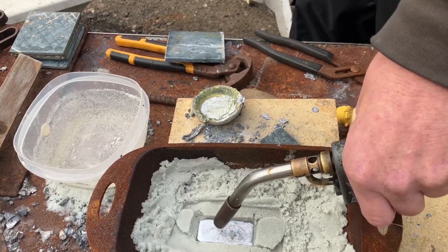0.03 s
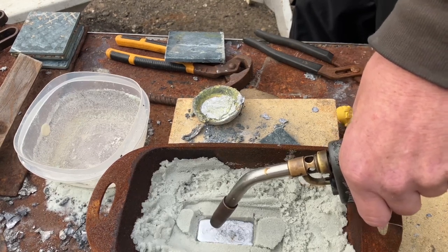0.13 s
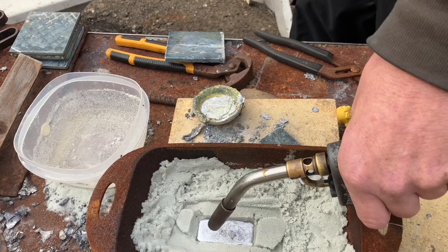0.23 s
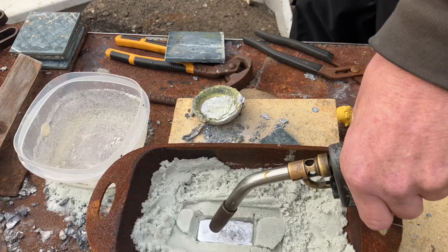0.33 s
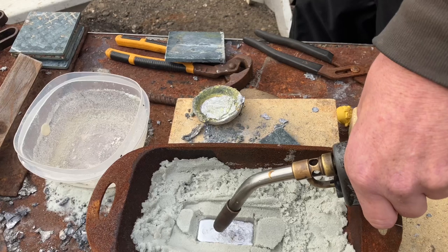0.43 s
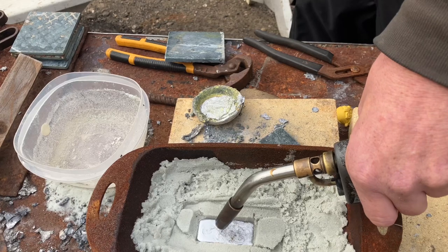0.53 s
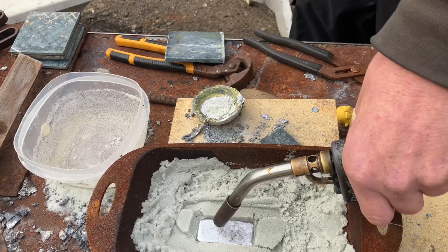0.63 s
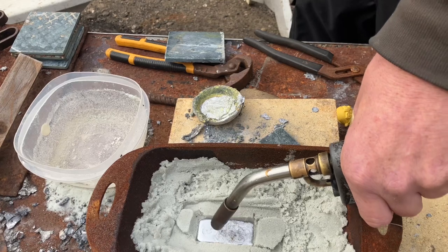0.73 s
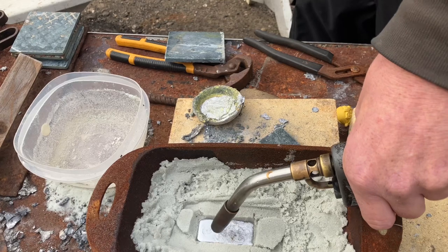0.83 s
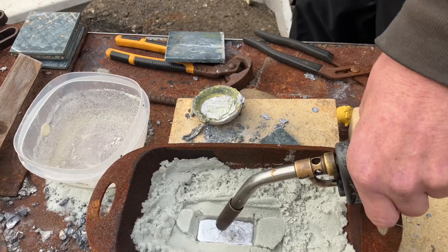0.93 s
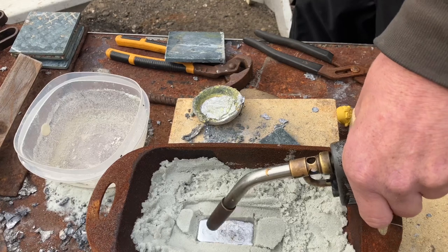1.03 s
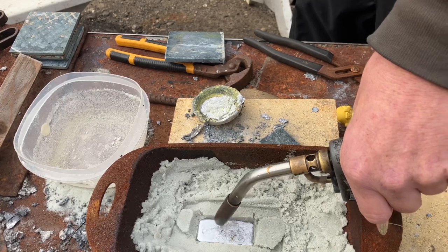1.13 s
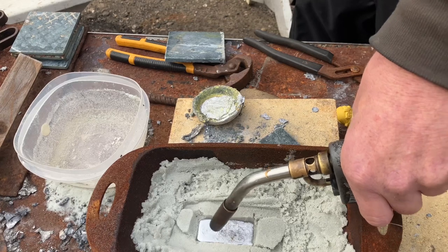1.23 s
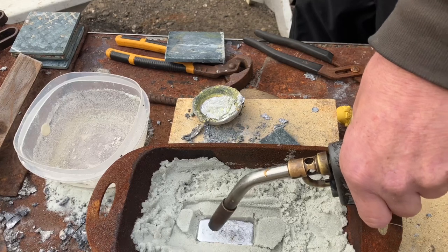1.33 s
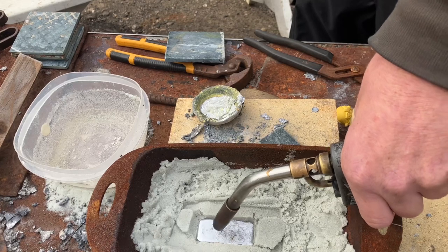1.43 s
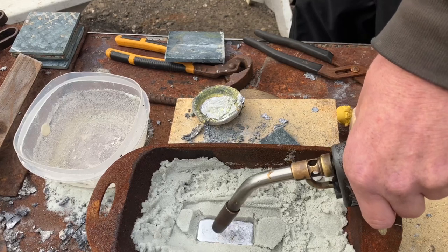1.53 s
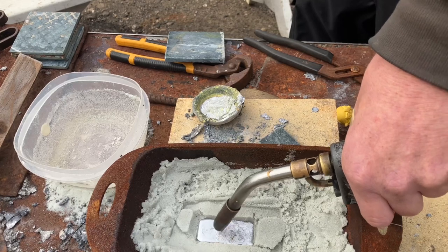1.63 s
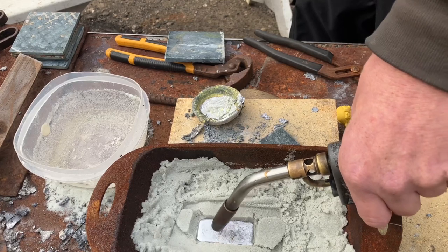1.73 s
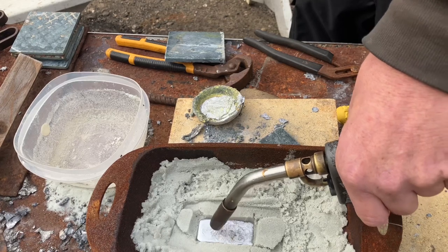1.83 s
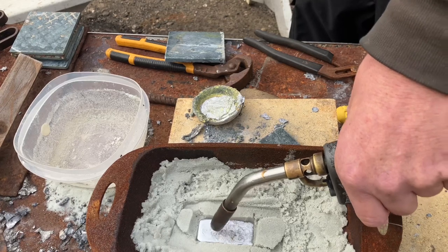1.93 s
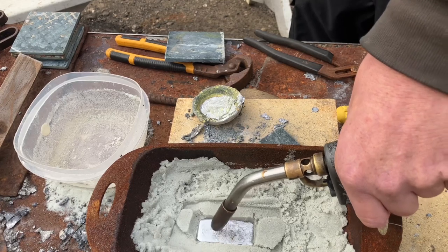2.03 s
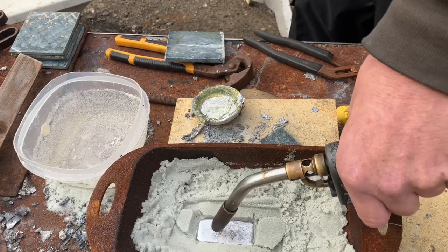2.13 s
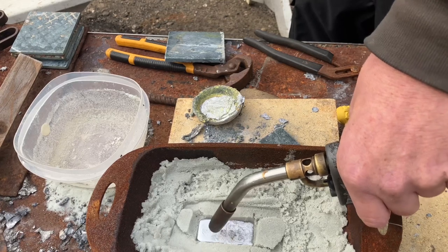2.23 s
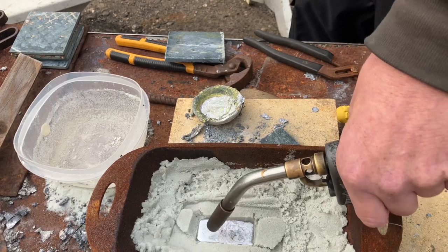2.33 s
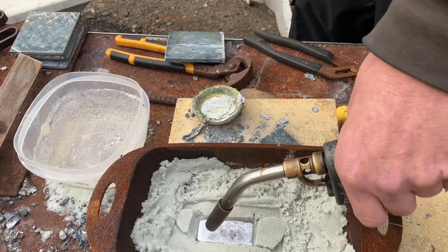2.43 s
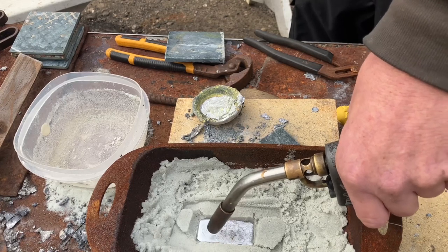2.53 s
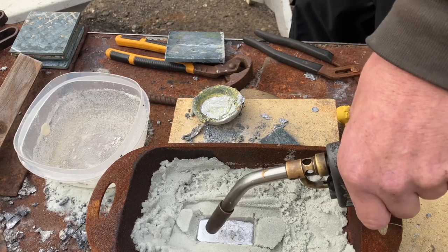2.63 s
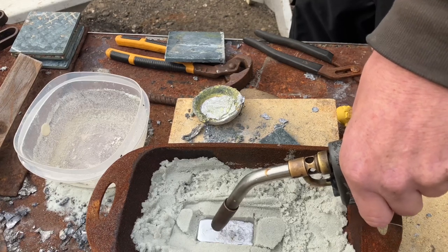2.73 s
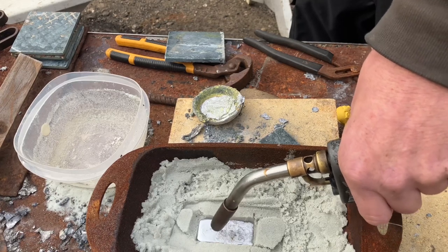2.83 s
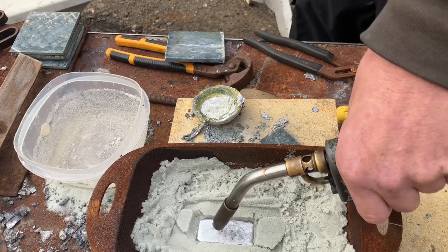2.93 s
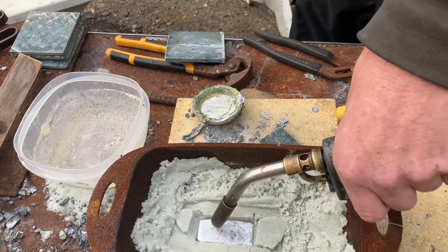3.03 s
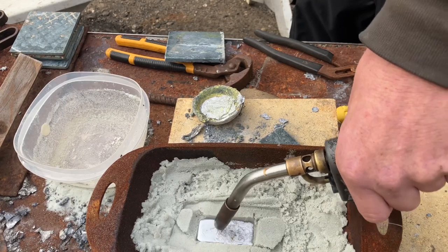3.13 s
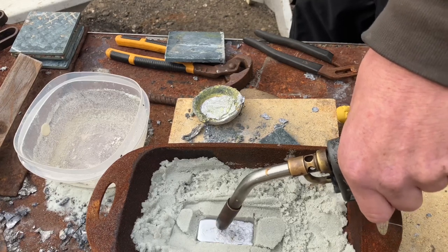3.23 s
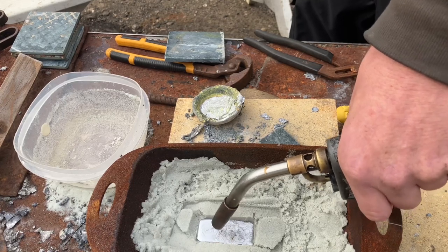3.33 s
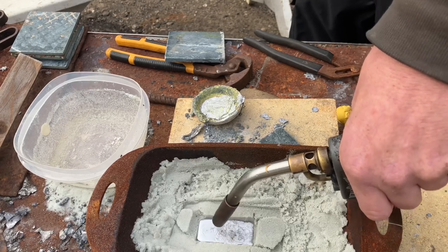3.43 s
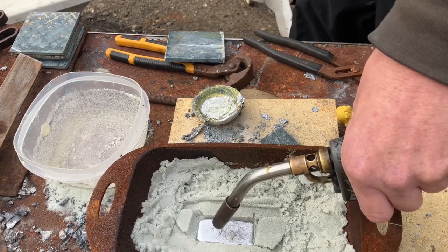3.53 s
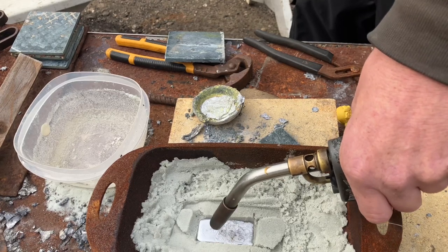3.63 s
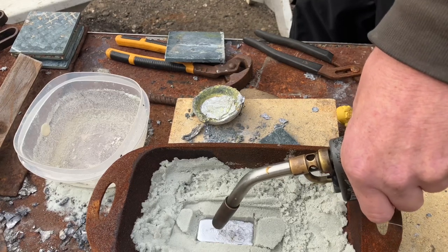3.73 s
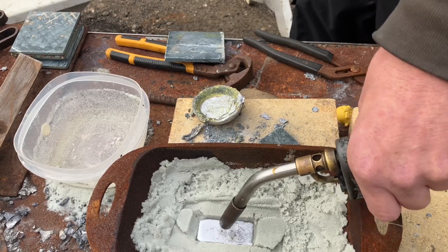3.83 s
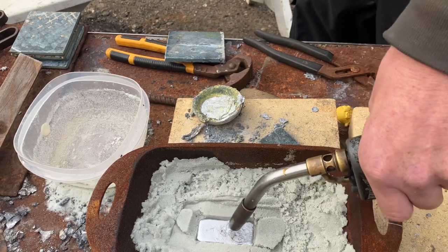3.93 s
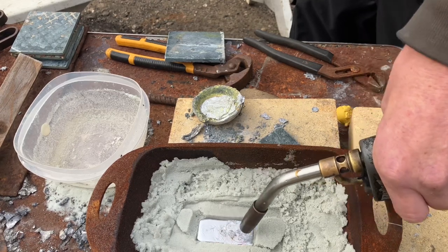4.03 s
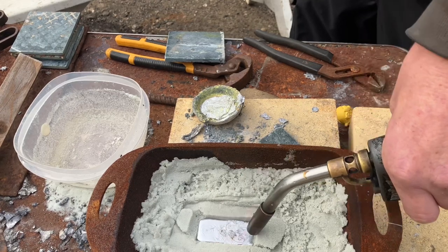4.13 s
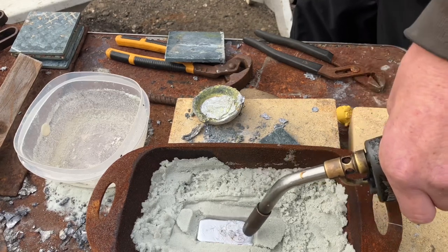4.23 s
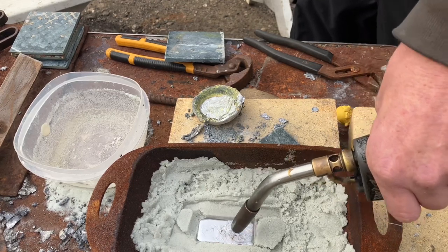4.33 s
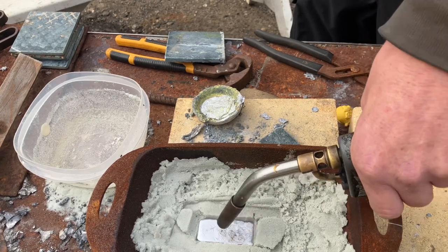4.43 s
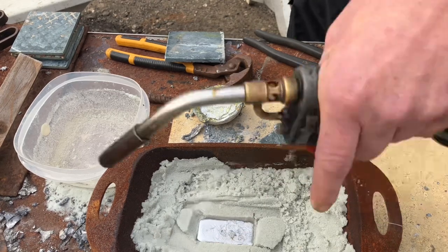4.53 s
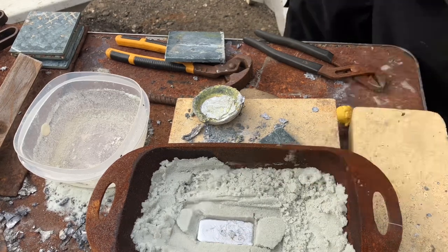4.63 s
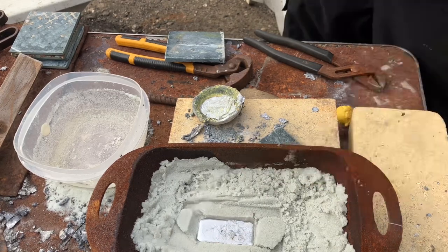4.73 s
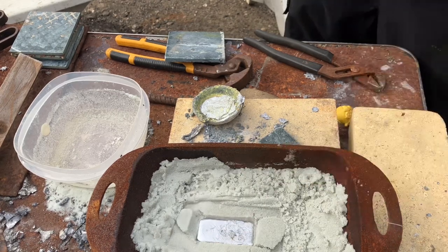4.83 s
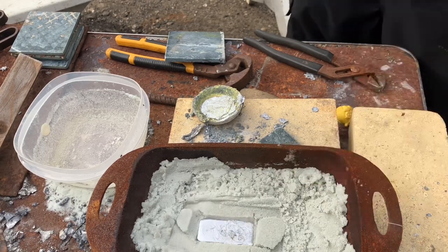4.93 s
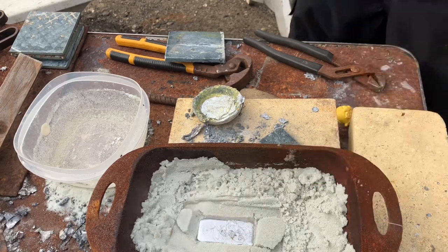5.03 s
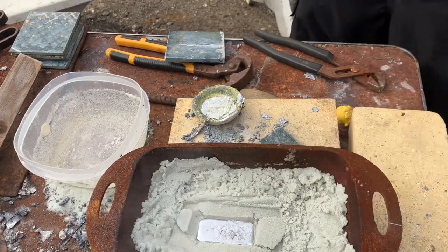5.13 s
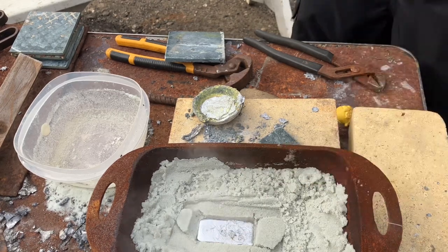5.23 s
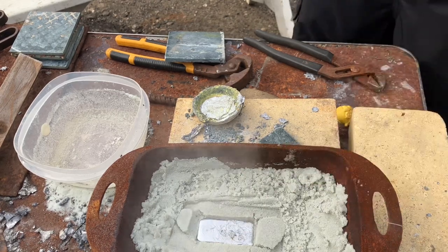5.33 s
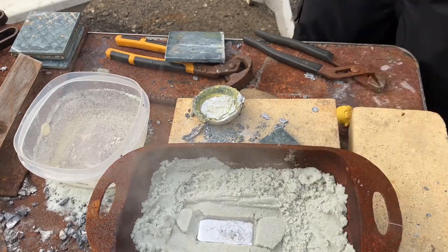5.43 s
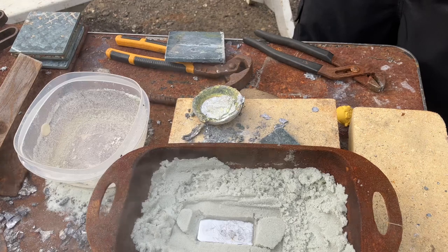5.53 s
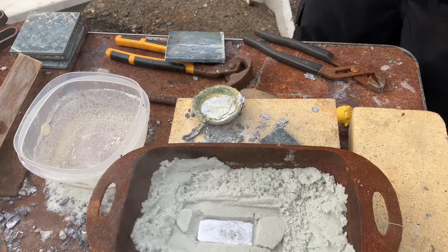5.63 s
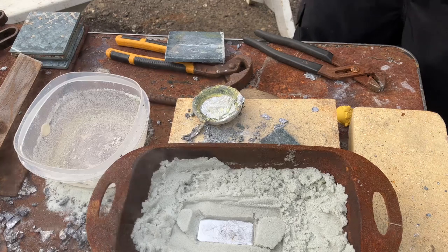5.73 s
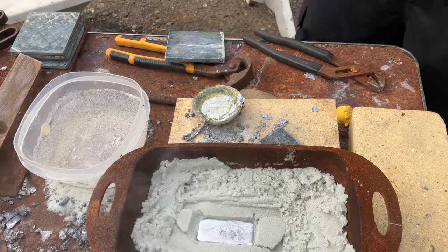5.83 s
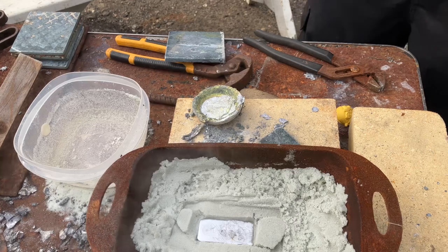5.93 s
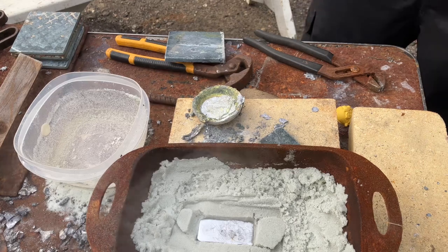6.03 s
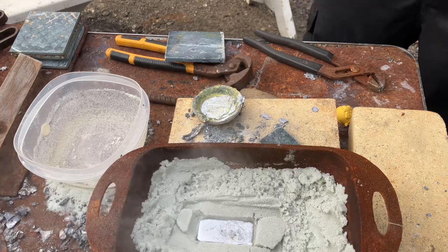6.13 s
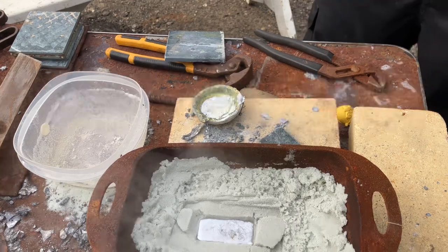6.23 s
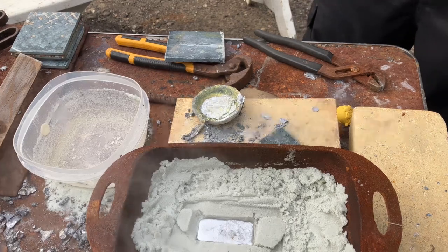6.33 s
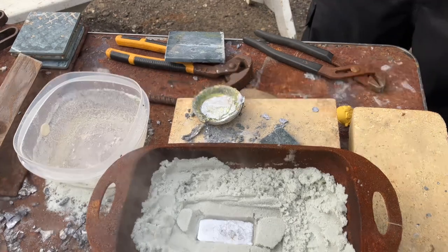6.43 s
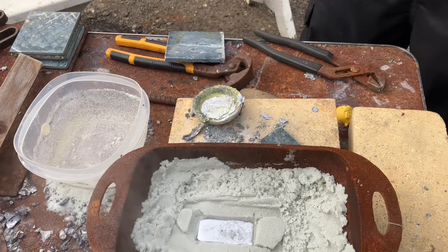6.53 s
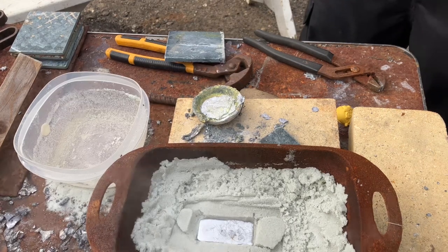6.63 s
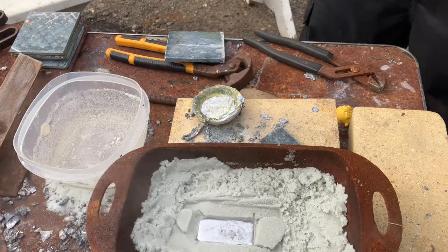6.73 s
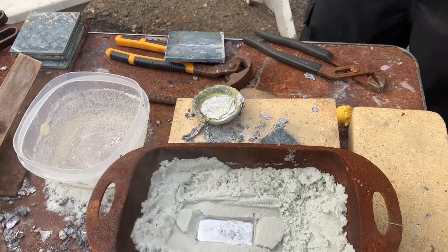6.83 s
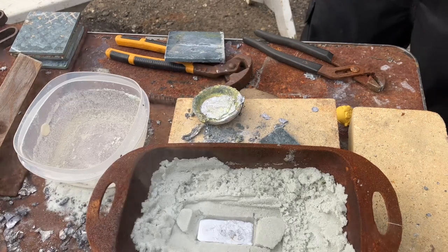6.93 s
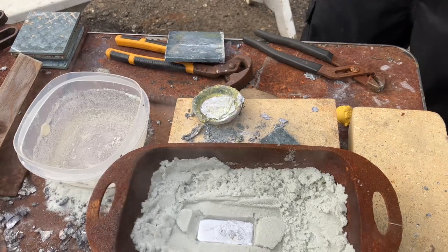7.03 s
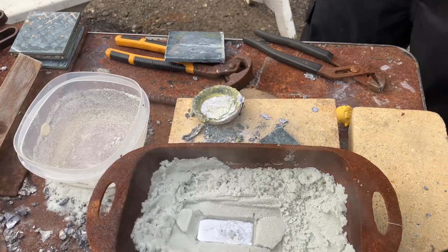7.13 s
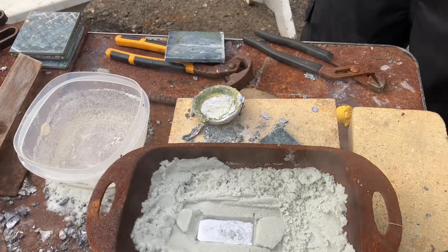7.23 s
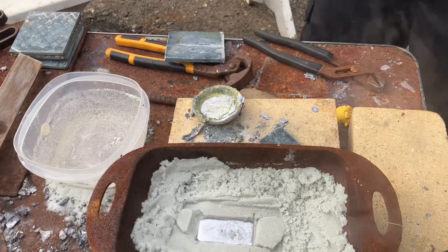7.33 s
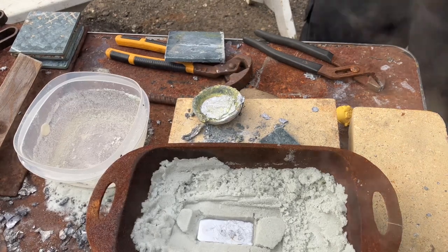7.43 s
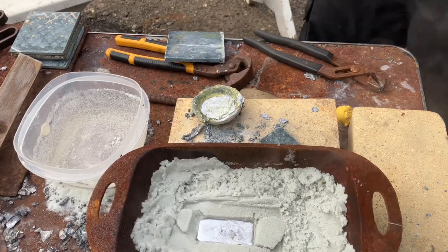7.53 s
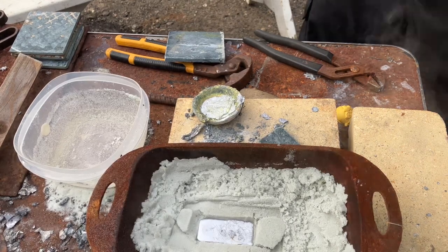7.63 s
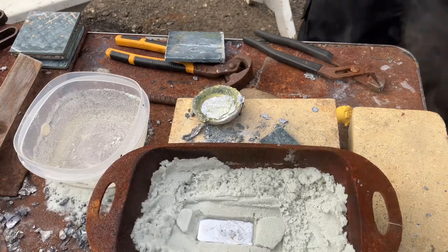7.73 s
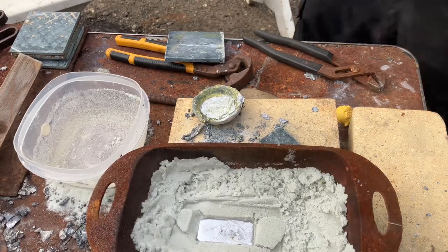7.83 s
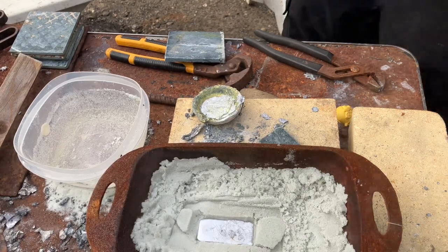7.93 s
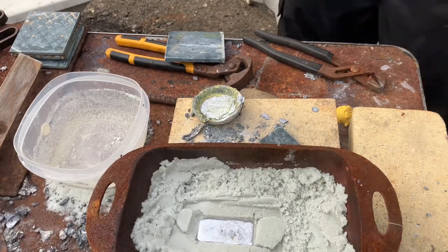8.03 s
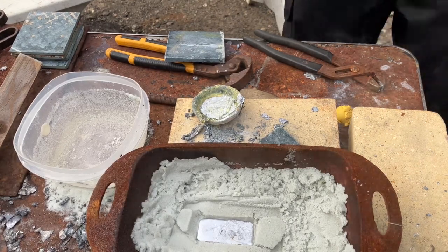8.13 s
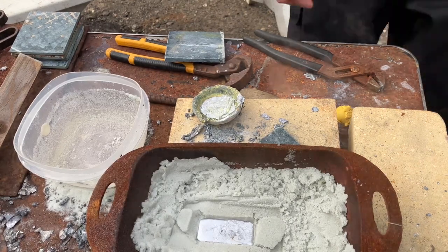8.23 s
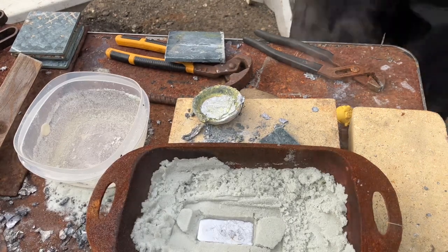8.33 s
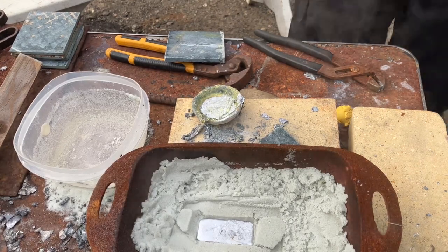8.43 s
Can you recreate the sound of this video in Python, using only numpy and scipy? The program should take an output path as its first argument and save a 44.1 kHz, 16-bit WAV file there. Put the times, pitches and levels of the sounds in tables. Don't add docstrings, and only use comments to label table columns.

```python
import sys
import numpy as np
from scipy import signal
from scipy.fft import rfft, irfft, next_fast_len
from scipy.io import wavfile
from scipy.ndimage import uniform_filter1d

SR = 44100
rng = np.random.default_rng(int(sys.argv[2]) if len(sys.argv) > 2 else 0)


def master_out(mix):
    frames = np.transpose(np.atleast_2d(mix))
    ceiling = np.clip(frames, -1, 1)
    pcm = np.round(ceiling * 32767).astype(np.int16)
    wavfile.write(sys.argv[1], SR, pcm)


def how_loud(loudness_db):
    steps = np.asarray(loudness_db, float) / 20
    return 10 ** steps


N = 374409
BINS = np.fft.rfftfreq(1024, 1 / SR)
FRAMES = N // 256 + 8

# pitch in Hz, level in dB per Hz.
YARD_COLOUR = [(30, -49.5), (60, -13), (110, -0.5), (200, -6), (400, -10.5), (600, -16), (900, -20),
               (1300, -12), (1800, -14.5), (2400, -21.5), (3300, -31.5), (5000, -46), (9500, -50.5),
               (15500, -59.5)]
# pitch in Hz, likeness from -1 to 1.
FAR_SAME = [(60, .9), (250, .93), (700, .25), (1200, -.2), (2000, -.35), (3500, -.3), (7000, 0),
            (9500, -.3), (11500, .8), (12600, .97), (13600, .3), (15200, -.9)]
# time in seconds, level in dB.
HUM = [
    (4.6, -60.5),
    (5.59, -56),
    (5.95, -61),
    (7.2, -61.5),
    (7.5, -52),
    (8.21, -53.5),
    (8.49, -67),
]
HUM_HZ = 129.2
WASH_DB, RUMBLE_DB = -64, -55.5
RECOVER_DB, RECOVER_S = -9, 1.11

# pitch in Hz, likeness from 0 to 1.
NEAR_SAME = [(60, .93), (250, .995), (2000, .98), (3000, .85), (4500, .7), (6200, .65), (7600, .3),
             (8900, .65), (9800, .65), (10700, .45), (11700, .98), (12600, .99), (13300, .68), (15300, .97)]
# pitch in Hz, lead of the left port in radians.
NEAR_PHASE = [(20, 0), (2050, .1), (2800, 1.1), (3750, 1.7), (4200, 2.7), (5200, 2.6), (6500, 1.5),
              (8000, 2.5), (8800, 3), (10100, 2.7), (11400, .1), (12800, 0), (13500, -1.2), (14900, -2.5),
              (15400, -3.1)]
# pitch in Hz, left minus right in dB.
NEAR_BALANCE = [(60, 1.5), (160, 3), (740, 3.5), (1220, 6), (2000, 4), (3400, 4.5), (4100, 2), (5000, 5),
                (5900, 8), (7700, 8), (8700, 2.5), (9500, 2), (10700, 2), (11700, 0)]

# pitch in Hz, level in dB per Hz.
RUSTLE_COLOUR = [(1500, -14), (3100, 0), (4500, -4.5), (6500, -6.5), (9500, -12), (15500, -9)]
# time in seconds, half length in seconds, level in dB.
SLEEVE = [
    (4.998, .15, -92),
    (5.7, .3, -84),
    (6.454, 0.19, -70),
    (6.628, .08, -72),
    (6.808, 0.28, -69),
    (7.022, 0.18, -76),
    (7.442, 0.12, -73),
    (7.923, 0.12, -73.5),
    (8.12, 0.18, -73.5),
    (8.395, 0.28, -74),
]
STILL_DB = -95
GRAINS_PER_S, GRAIN_S = 60, .004

# body pitch in Hz, low knock in dB, top sparkle in dB.
TICK, SNAP, KNOCK = (3000, -37, 1.5), (2900, -18, -21.5), (3500, 0.86, -3.5)
CLACK, DULL, PING = (5200, -17, -8), (2370, -1, -27.5), (6000, -7.5, -2)
TRIGGER = (3000, -17.5, -2.5)
# time in seconds, peak in dB, tail against the peak in dB, kind of contact.
CLICKS = [(4.937, -47.5, -2, PING), (4.9754, -64, -9, KNOCK), (5.2338, -60, -11, TICK),
          (5.2744, -69, -22, TICK), (5.3362, -55.5, -18, TICK), (5.4261, -34, -11, DULL),
          (5.461, -43.5, 0, SNAP), (5.8112, -58, -10, DULL), (6.1733, -19, -28, TRIGGER),
          (6.23, -46, -8, TICK), (6.3218, -40, -5, KNOCK), (6.432, -38, -6, KNOCK), (6.551, -54, -5, KNOCK),
          (6.571, -38, -20, PING), (6.5914, -10, -42, SNAP), (6.5875, -30, -30, SNAP),
          (6.8058, -37, -16, SNAP), (7.0279, -43.5, -11, CLACK), (7.0463, -50, -16, SNAP),
          (7.0717, -46, -3, TICK), (7.1797, -55, -17, KNOCK), (7.365, -18.5, -14, CLACK),
          (7.356, -40, -10, SNAP), (7.3807, -33, -12, SNAP), (7.4587, -28, -41, CLACK),
          (7.482, -47, -2, CLACK), (7.4923, -42, -20, CLACK), (7.4973, -34, -19, CLACK),
          (7.517, -55, -16, CLACK), (7.5054, -50, -16, CLACK), (8.2044, -60, -12.5, TICK),
          (8.327, -53, -5, PING), (5.44, -59, -14, PING), (6.074, -68, -22, PING), (7.19, -65.5, -17, TICK)]
# time in seconds, level in dB, pitch in Hz.
THUDS = [(5.428, -38, 166.6), (5.449, -36.5, 179), (5.943, -43, 150), (6.038, -49, 119.8),
         (6.3255, -33, 620), (6.322, -36, 900), (6.336, -41, 393), (6.44, -39, 480), (6.452, -40.5, 252),
         (6.431, -43.5, 290), (6.55, -41, 337.4), (6.552, -45, 804), (6.592, -33.5, 404),
         (6.609, -34.5, 240), (6.765, -46, 130), (6.797, -41, 152), (6.861, -43, 235), (6.979, -41, 460),
         (6.975, -46, 300), (6.98, -47, 150), (6.6, -40, 150), (6.365, -46, 100), (6.45, -45, 110),
         (6.2, -47, 110), (6.2, -48, 440), (6.611, -46, 1600), (6.868, -45, 200), (6.775, -46, 210),
         (6.84, -48, 170), (6.25, -46, 200), (6.205, -46, 230), (7.201, -52, 90), (7.364, -40.5, 530),
         (7.363, -29, 1590), (6.33, -39, 260), (6.345, -44, 520), (6.1748, -11, 6900), (6.1745, -15, 5600),
         (6.174, -39, 1120), (6.182, -39, 5600), (6.19, -42, 5300), (6.5933, -9, 4170), (6.586, -33, 3870),
         (6.594, -24, 1300), (6.599, -40, 322), (6.619, -38, 194), (8.33, -46, 1660), (8.343, -54, 1900),
         (8.354, -47, 2350), (8.369, -45, 840), (8.372, -52, 2050), (8.384, -48, 2100), (8.386, -49, 900),
         (8.412, -52, 2200), (8.447, -37, 2400), (8.468, -48, 3000)]
# time in seconds, level in dB; then the time scale in seconds.
CRACKS, CRACK_S = [(6.5926, -31)], .00004

# pitch in Hz, level in dB, time to die by 60 dB in seconds.
NECK = [(2929, -12, .3), (3989, -6, .1), (6272, -12, .15), (6761, -16, .3), (8100, -14, .17),
        (9884, -1, .09), (750, 8, .07), (980, 4, .04), (450, 5, .08), (2756, -6, .12), (3424, -4, .085),
        (5561, -10, .08), (12370, -10, .12), (13940, -8, .1)]
NOZZLE = [(2778, -1, .13), (3445, -2, .8), (6115, -13, .24), (6665, -9, .19), (8102, -16, .3),
          (10820, 1, .08), (780, -2, .06), (520, -3, .06), (3962, -16, .2), (4786, -14, .13),
          (5744, -13, .1), (10340, -10, .13), (12560, -6, .2), (11400, -15, .35)]
LIP, COLLAR, RIM = [(3445, 0, .6)], [(2929, 0, .35)], [(2799, 0, .25), (2990, -5, .4)]
VALVE = [
    (2799, -24, .3),
    (3235, 0, .09),
    (3445, -16, .3),
    (4400, -14, .07),
    (5782, -12, .1),
    (7063, -15, .06),
]
# time in seconds, level in dB, seconds until a hand damps it, modes that ring.
RINGS = [(6.321, -53, 0.16, NECK), (6.432, -48.5, 0.24, NOZZLE), (7.072, -37.5, 0.1, VALVE),
         (5.462, -74, 0.11, NOZZLE), (6.715, -51, 0.043, VALVE), (6.797, -60, 0.028, VALVE),
         (6.845, -66, .03, VALVE), (6.909, -60, .03, VALVE), (6.948, -51, 0.043, VALVE),
         (6.976, -67, .11, LIP), (6.552, -52, .04, LIP), (6.334, -59, .1, COLLAR), (7.088, -58, .09, RIM),
         (7.028, -53, 0.033, VALVE), (7.045, -54, 0.047, VALVE), (7.093, -67, 0.11, NOZZLE),
         (7.4, -63, 0.045, NOZZLE), (4.56, -76, 0.06, NOZZLE)]
FLUTTER_DB = 1.2
# start in seconds, length in seconds, start Hz, end Hz, level in dB.
SQUEAKS = [
    (5.427, .025, 2480, 2250, -45),
    (5.447, .018, 2150, 1750, -49),
    (5.426, .012, 5000, 4800, -57),
    (5.70, .035, 5950, 6050, -76),
    (7.364, .028, 1500, 1450, -47),
    (4.503, .012, 1480, 1680, -26),
    (4.516, .014, 1750, 1650, -40),
    (4.53, .011, 1550, 1800, -46),
]
# start and end in seconds, start
# and end level in dB, upper edge in Hz.
SCRAPES = [(6.548, 6.572, -65, -56, 11500), (6.571, 6.576, -50, -54, 9000),
           (6.572, 6.594, -56.5, -39, 5970), (6.605, 6.64, -61, -68, 5200), (6.604, 6.624, -68, -70, 4500),
           (7.333, 7.361, -68, -44, 7350), (7.363, 7.431, -40.5, -69, 6940), (6.176, 6.186, -54, -62, 7540),
           (6.694, 6.92, -63, -82, 8500), (6.935, 6.96, -69, -68, 7950), (7.074, 7.112, -56, -64, 9000),
           (7.178, 7.197, -61, -69, 7800), (8.326, 8.391, -60.5, -62, 2530), (8.4, 8.48, -70, -65, 2980),
           (4.934, 5.005, -70, -82, 12100), (5.513, 5.56, -72, -82.5, 15500), (5.69, 5.75, -87, -80, 15000),
           (5.833, 5.887, -78, -84, 15000)]
# pitch in Hz, width in Hz, level in dB.
DRAG_MODES = [
    (3070, 200, 0),
    (3410, 30, -3),
    (3940, 60, -5),
    (4280, 84, -5),
    (6260, 200, -17),
    (6620, 120, -15),
]
# start in seconds, length in seconds, level in dB.
DRAGS = [
    (6.698, 0.069, -61.5),
    (6.739, 0.042, -66),
    (6.781, .045, -63),
    (6.825, 0.053, -68),
    (6.865, 0.061, -69),
    (6.926, .045, -67.5),
    (6.974, .05, -69),
    (6.573, 0.02, -53),
]
CATCHES_PER_S, CATCH_SPREAD_DB = 650, 4

# pitch in Hz, level in dB per Hz.
FLAME_COLOUR = [(40, -38), (100, -15), (280, -3), (800, -4), (1900, -3), (2050, -6), (2900, -7),
                (4000, -17), (6200, -16), (7800, -19), (9300, -23), (10600, -21), (14000, -20),
                (15600, -21)]
# pitch in Hz, width in Hz, level in dB.
TUBE = [
    (915, 45, 2.5),
    (1486, 450, 6),
    (1789, 27, 9.5),
    (3900, 260, 4.5),
    (3500, 350, -1.5),
    (4440, 210, 3.5),
    (6100, 230, 0),
]
# time in seconds, depth in dB, recovery in seconds.
GULPS = [(1.0, 1.5, 0.082), (1.35, 3.5, 0.12), (1.728, 2.5, 0.052), (2.25, 4, 0.019), (2.388, 10, 0.018),
         (2.46, 5.5, 0.027), (3.154, 10.5, 0.049), (3.35, 2, 0.025), (3.601, 11, 0.019),
         (3.635, 9.5, 0.019), (3.917, 8, 0.041), (4.02, 4, 0.024), (4.497, 6, 0.043)]
CHOKE_S = 0.024
# time in seconds, level in dB, pitch in Hz.
PUFFS = [
    (2.406, -22, 523),
    (2.51, -17, 315),
    (3.928, -23.5, 388),
    (4.371, -26, 490),
]
# time in seconds, half length in seconds, level in dB.
FLARES = [(.19, 0.23, 6), (0.643, 0.051, 3.5), (0.894, 0.059, 4), (1.19, 0.17, 7.5), (1.523, 0.15, 8),
          (1.652, 0.048, 6), (1.923, 0.2, 0.5), (2.11, 0.13, 7), (2.63, 0.053, 6), (2.854, 0.12, 3),
          (3.09, 0.38, 2), (3.326, 0.044, 5.5), (3.428, 0.082, 7.5), (3.852, 0.09, 6.5), (4.19, 0.24, 5),
          (4.41, 0.081, 2.5)]
# time in seconds, depth in dB.
DEPTH = [(0, 2), (.25, 1.5), (.5, 0.5), (.8, -1), (1.9, -0.5), (2.13, -3.5), (2.22, 5), (2.3, 1),
         (3.3, 1.5), (3.5, 5.5), (3.9, 1.5), (3.98, -4.5), (4.33, -4.5), (4.39, 2)]
HOLLOW_HZ, HOLLOW_DB = (620, 955), 0.5
ROAR_DB, TUBE_DB, EDGE_DB, FIZZ_DB, JET_DB = -39, -31, -46.5, -57, -52
LAYERS = [
    (.05, 0.11, 0.55),
    (.25, 1.31, 0.031),
    (.6, 1.02, -0.28),
    (.95, .9, -0.28),
    (.98, 0.14, .05),
]
EDGE_SAG_DB_PER_S = -0.45
SHUT_S, SHUT_T60 = 4.508, 0.083

# lower edge in Hz, upper edge in Hz.
OPPOSED = [
    (4600, 5700),
    (4080, 4330),
    (4950, 5300),
    (3950, 4400),
]
# time in seconds, half length in seconds, share, band number.
LOW_OPPOSED = [(3.75, .11, 1.8, 0), (3.85, .1, .8, 0), (3.5, .08, .6, 0), (3.98, .35, 1.1, 2),
               (3.2, .45, .55, 2), (2.4, .25, .5, 2), (4.46, .1, .8, 2), (.6, 1.2, .8, 1), (1.4, .1, .5, 1),
               (2.2, .6, .5, 1), (3.78, .15, 1.6, 1), (4.15, .25, .9, 1), (4.44, .09, 1.4, 3)]
# time in seconds, edge in Hz; then its top in Hz.
NULL_EDGE, NULL_TOP_HZ = [(0, 9000), (.4, 8450), (2.1, 8400), (2.25, 9150), (2.9, 9100), (3, 8400)], 10250
OPPOSED_SHARE, RAGGED = 0.9, .17
# time in seconds, half length in seconds.
LIFTS = [
    (.08, .17),
    (0.89, .09),
    (1.2, .2),
    (1.62, .13),
    (2.19, .09),
    (2.8, .22),
    (3.7, .14),
    (4.11, .13),
    (4.31, .11),
    (4.52, .06),
]


def evened(x):
    return x / np.sqrt(np.mean(np.atleast_2d(x).mean(0) ** 2) + 1e-20)


def read(points, hz):
    f, value = np.transpose(points)
    return np.interp(np.log(hz + 1), np.log(f + 1), value)


def curve(rows):
    s, value = np.transpose(rows)
    return np.interp(np.arange(N) / SR, s, value)


def hump(t, s, half):
    return np.cos(np.pi / 2 * np.clip((t - s) / half, -1, 1)) ** 2


def add(mix, s, sound):
    part = mix[round(s * SR):][:len(sound)]
    part += sound[:len(part)]


def band(x, low_hz, high_hz):
    size = next_fast_len(N)
    hz = np.fft.rfftfreq(size, 1 / SR)
    edge = lambda at_hz: np.clip(.5 + np.log2((hz + 1) / at_hz) * 4, 0, 1)
    return irfft(rfft(x, size) * edge(low_hz) * (1 - edge(high_hz)))[..., :N]


def noise(colour_db, same, phase, balance_db, patchy_db, flicker_db, centring=0):
    a, b, c, d, patches = rng.standard_normal((FRAMES, len(BINS), 5)).T
    patches = uniform_filter1d(uniform_filter1d(patches, size=14, axis=0), size=12, axis=1)
    patches = patches / patches.std()
    centring = centring * np.clip(1 - RAGGED * patches, 0, 1)
    same = np.clip(same, -1, 1)[:, None]
    same = same + centring * (1 - same)
    phase = phase[:, None] + centring * (np.pi - phase[:, None])
    balance_db = balance_db[:, None] * (1 - centring)
    left = a + 1j * b
    right = same * left + np.sqrt(1 - same ** 2) * (c + 1j * d)
    right = right * np.exp(-1j * phase) / how_loud(balance_db)
    spectra = np.array([left, right]) * how_loud(colour_db[:, None] + patchy_db * patches)
    flicker = evened(uniform_filter1d(rng.standard_normal(N), size=500))
    sound = signal.istft(spectra, nperseg=1024, noverlap=768)[1][:, :N]
    return sound * how_loud(flicker_db * flicker)


def yard():
    after = np.maximum(np.arange(N) / SR - SHUT_S, 0)
    held_db = RECOVER_DB * np.exp(-after / RECOVER_S)
    colour, same = read(YARD_COLOUR, BINS), read(FAR_SAME, BINS)
    far = noise(colour, same, 0 * BINS, 1.9 + 0 * BINS, patchy_db=1.0, flicker_db=.7)
    wash = how_loud(WASH_DB + held_db) * evened(band(far, 588, 22000))
    rumble = how_loud(RUMBLE_DB + held_db) * evened(band(far, 1, 588))
    waver_hz = 0.69 * evened(uniform_filter1d(rng.standard_normal(N), size=6000))
    hum = np.sin(2 * np.pi * np.cumsum(HUM_HZ + waver_hz) / SR) * how_loud([[1.2], [-1.2]])
    return wash + rumble + how_loud(curve(HUM)) * hum


def rustle():
    ports = .5 * read(NEAR_SAME, BINS), 0.47 * read(NEAR_PHASE, BINS), .6 * read(NEAR_BALANCE, BINS)
    cloth = noise(read(RUSTLE_COLOUR, BINS), *ports, patchy_db=.8, flicker_db=3.5)
    t = np.arange(N) / SR
    level = how_loud(STILL_DB) + sum(how_loud(db) * hump(t, s, half) for s, half, db in SLEEVE)
    grains = (rng.random(N) < GRAINS_PER_S / SR) * how_loud(8 * rng.exponential(1, N).clip(0, 3))
    grit = signal.lfilter([1], [1, -np.exp(-1 / (GRAIN_S * SR))], grains)
    level *= 1 + .6 * evened(grit)
    return level * evened(band(cloth, 2500, 14500)) / 1.6


def clicks():
    out, u = np.zeros(N), np.arange(6000) / SR
    hiss = rng.standard_normal((len(CLICKS), 6000))
    cut = lambda hz, kind: signal.sosfilt(signal.butter(2, hz, kind, fs=SR, output="sos"), hiss)
    lows = 4 * cut([250, 1800], "band")
    mids = 2 * cut([1800, 6500], "band")
    tops = 0.5 * cut(10000, "high")
    snap = (u / 0.001) ** 2 * np.exp(2 - 2 * u / 0.00097)
    for (s, db, tail_db, (hz, low_db, top_db)), low, mid, top in zip(CLICKS, lows, mids, tops):
        bright = 0.34 * mid + how_loud(top_db + 11.0) * top
        body = 0.36 * np.sin(2 * np.pi * hz * u) * snap ** 1.3
        knock = how_loud(low_db) * low * (0.2 * snap + 0.28 * np.exp(-u / 0.011))
        rattle = bright * (.5 * snap + how_loud(tail_db - 60 * u / 0.031))
        add(out, s, how_loud(db) * (body + knock + rattle))
    for s, db in CRACKS:
        x = u / CRACK_S
        add(out, s, how_loud(db) * (2 - x) * x * np.exp(2 - x))
    for s, db, hz in THUDS:
        fade = how_loud(db - 60 * u * hz / 14)
        add(out, s, fade * np.sin(2 * np.pi * hz * u) * np.minimum(u / 0.0011, 1))
    return out


def scrapes():
    out = np.zeros(N)
    for start, end, from_db, to_db, top_hz in SCRAPES:
        jerks, swell = rng.standard_normal((12000, 2))[:round((end - start) * SR)].T
        slips = jerks * how_loud(2.6 * evened(uniform_filter1d(swell, size=60)))
        sos = signal.butter(2, [top_hz / 4, top_hz], "band", fs=SR, output="sos")
        slips = signal.sosfilt(sos, slips) + 0.049 * slips
        level = how_loud(np.linspace(from_db, to_db, len(slips)))
        add(out, start, evened(slips) * level * signal.windows.tukey(len(slips), .12))
    return out


def rings():
    out, u = np.zeros(N), np.arange(SR // 5) / SR
    cloud_hz = 3000 + 11500 * rng.random((len(RINGS), 110, 1)) ** 1.3
    rattles = rng.standard_normal((len(RINGS), 500)) * np.exp(-u[:500] / 0.0035)
    for (s, strike_db, held, modes), small_hz, rattle in zip(RINGS, cloud_hz, rattles):
        shake = uniform_filter1d(rng.standard_normal((14, 120)), size=3, axis=1)
        shake = evened(shake.ravel()).reshape(14, 120)
        ring = np.zeros(len(u))
        for (hz, db, t60), flutter in zip(modes, shake):
            flutter_db = FLUTTER_DB * np.interp(u, np.arange(120) / 500, flutter)
            ring += how_loud(db - 60 * u / t60 + flutter_db) * np.sin(2 * np.pi * hz * u)
        small = np.sin(2 * np.pi * small_hz * u).sum(0)
        cloud = how_loud(-27 - 60 * u / 0.19) * signal.fftconvolve(small, rattle)[:len(u)]
        whole = ring * np.minimum(u / 0.0017, 1) + cloud / np.linalg.norm(rattle)
        add(out, s, how_loud(strike_db) * whole * np.clip((held - u) / 0.031, 0, 1))
    return out


def squeaks():
    out = np.zeros(N)
    for s, length, from_hz, to_hz, db in SQUEAKS:
        hz = from_hz + (to_hz - from_hz) * np.linspace(0, 1, round(length * SR)) ** 2
        wobble = 1 + 0.074 * uniform_filter1d(rng.standard_normal(2500), size=40)[:len(hz)]
        tone = np.sin(2 * np.pi * np.cumsum(hz * wobble) / SR)
        add(out, s, how_loud(db) * tone * np.hanning(len(hz)) ** .5)
    return out


def drag():
    out, u = np.zeros(N), np.arange(1500) / SR
    body = np.zeros(len(u))
    for hz, width, db in DRAG_MODES:
        fade = np.exp(-np.pi * (width + 60) * u)
        body += how_loud(db) * np.sqrt(width) * fade * np.sin(2 * np.pi * hz * u)
    for s, length, db in DRAGS:
        chance, side, size = rng.random((4000, 3))[:round(length * SR)].T
        catches = (chance < CATCHES_PER_S / SR) * np.sign(side - .5)
        catches = catches * how_loud(-CATCH_SPREAD_DB * np.log(size + 0.1))
        stroke = np.hanning(len(catches)) ** .5
        add(out, s, how_loud(db) * evened(signal.fftconvolve(catches * stroke, body)))
    return out


def bench(x):
    u = np.arange(5000) / SR
    echo = rng.standard_normal((2, 5000)) * how_loud(-60 * u / 0.075)
    echo = echo * (u > .002) * (rng.random((2, 5000)) < .2)
    wet = signal.fftconvolve(x[None], echo / np.linalg.norm(echo[0]), axes=1)[:, :N]
    size = next_fast_len(N)
    hz = np.fft.rfftfreq(size, 1 / SR)
    port = np.exp(1.8j * np.tanh(hz / 4800)) / how_loud(.6 * read(NEAR_BALANCE, hz))
    right = irfft(rfft(x, size) * port)[:N]
    return band(how_loud(2.0) * np.array([x, right]) + how_loud(-12.5) * wet, 1, 15000)


def opposition():
    frame_s = np.arange(FRAMES) * 256 / SR

    def inside(low, high):
        depth = np.minimum(BINS[:, None] - low, high - BINS[:, None])
        return np.clip(depth / (high - low) * 4 + .5, 0, 1)

    low_part = sum(share * hump(frame_s, s, half) * inside(*OPPOSED[k]) for s, half, share, k in LOW_OPPOSED)
    high_share = OPPOSED_SHARE * (1 - sum(hump(frame_s, *turn) for turn in LIFTS))
    low_edge = np.interp(frame_s, *np.transpose(NULL_EDGE))
    high_part = np.clip(high_share, 0, 1) * inside(low_edge, NULL_TOP_HZ)
    return np.clip(low_part + high_part, 0, 1)


def relights():
    out, u = np.zeros(N), np.arange(1300) / SR
    for s, db, hz in PUFFS:
        swell = (u / 0.0026) * np.exp(1 - u / 0.0016)
        add(out, s, how_loud(db) * np.sin(2 * np.pi * hz * u) * swell)
    return out * how_loud([[1.5], [-1.5]])


def torch():
    t = np.arange(N) / SR
    tube_db = sum(db / (1 + ((BINS - hz) / (width / 2)) ** 2) for hz, width, db in TUBE)
    colour_db = read(FLAME_COLOUR, BINS) + tube_db
    ports = read(NEAR_SAME, BINS), read(NEAR_PHASE, BINS), read(NEAR_BALANCE, BINS)
    gas = noise(colour_db, *ports, patchy_db=.7, flicker_db=1.2, centring=opposition())
    gulp_db = np.zeros(N)
    for s, db, back in GULPS:
        gulp_db -= db * np.clip((t - s) / CHOKE_S + 1, 0, 1) * np.exp(-np.maximum(t - s, 0) / back)
    flare_db = sum(db * hump(t, s, half) for s, half, db in FLARES)
    depth_db = curve(DEPTH)
    steady = ROAR_DB, TUBE_DB, EDGE_DB + EDGE_SAG_DB_PER_S * t, FIZZ_DB, JET_DB
    cuts = 1, 700, 3200, 8300, 11500, 21000
    out = np.zeros((2, N))
    for db, (flare, gulp, depth), low, high in zip(steady, LAYERS, cuts, cuts[1:]):
        level_db = db + flare * flare_db + gulp * gulp_db + depth * depth_db
        out += how_loud(level_db) * evened(band(gas, low, high))
    out += (how_loud(HOLLOW_DB * depth_db) - 1) * band(out, *HOLLOW_HZ)
    after = np.maximum(t - SHUT_S, 0)
    shut = after > 0
    out *= how_loud(-60 * after / SHUT_T60 - 3.1 * shut) + how_loud(-33 - 60 * after / 0.15) * shut
    return out + relights()


def scene():
    contacts = clicks() + scrapes() + rings() + squeaks() + drag()
    return torch() + yard() + rustle() + bench(contacts)


def roll_off(x):
    return signal.sosfilt(signal.butter(12, 15630, fs=SR, output="sos"), x)


def record(dry):
    thin = signal.sosfilt(signal.butter(2, 90, "high", fs=SR, output="sos"), dry)
    edge = signal.firwin(511, 15950, window=("kaiser", 9), fs=SR)
    return roll_off(signal.oaconvolve(thin, edge[None], "same"))


dry = scene()
out = record(dry)
master_out(out)
```